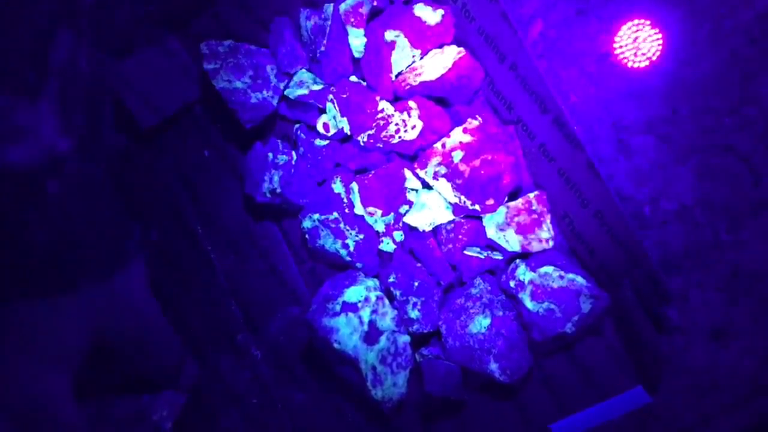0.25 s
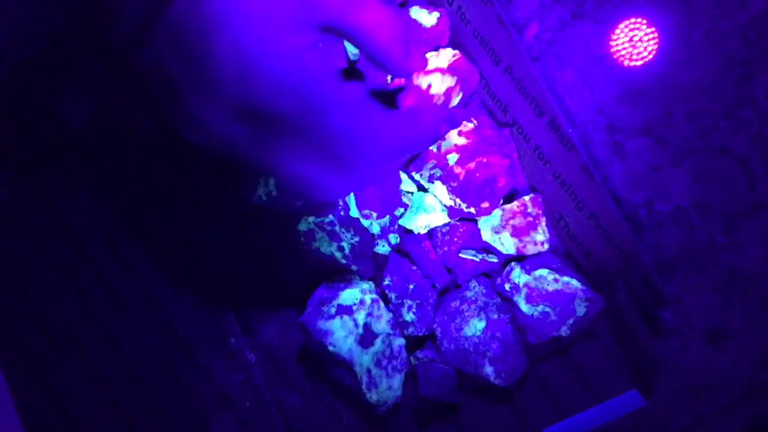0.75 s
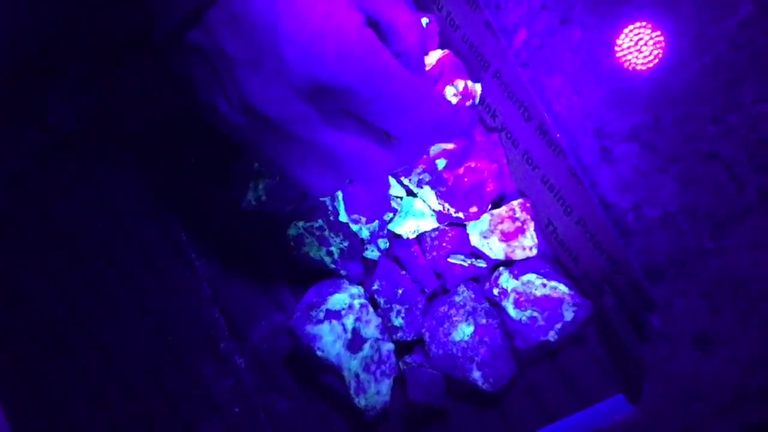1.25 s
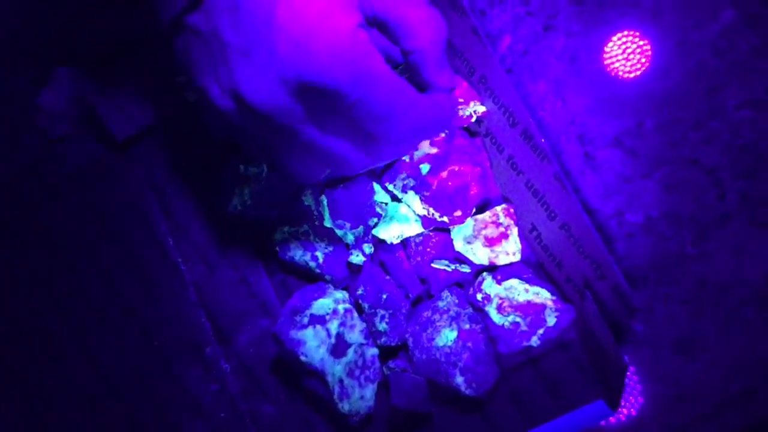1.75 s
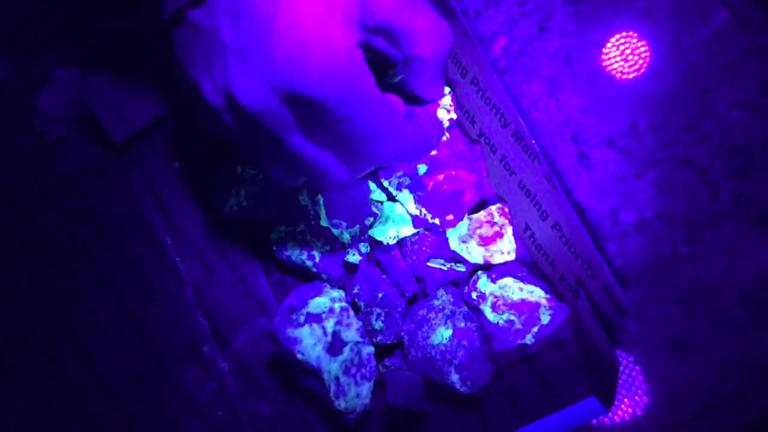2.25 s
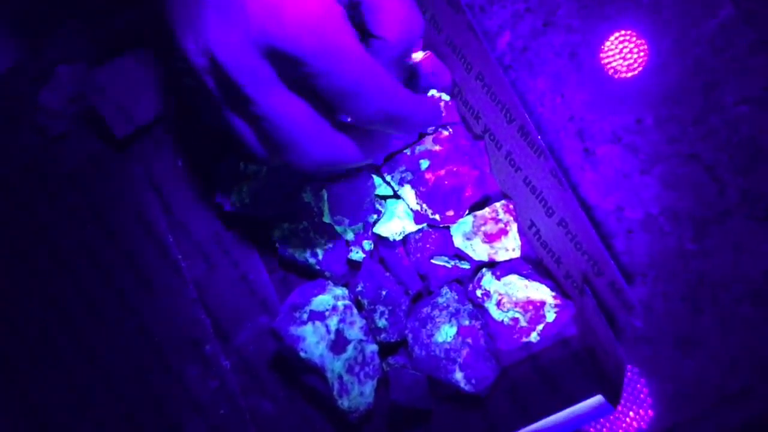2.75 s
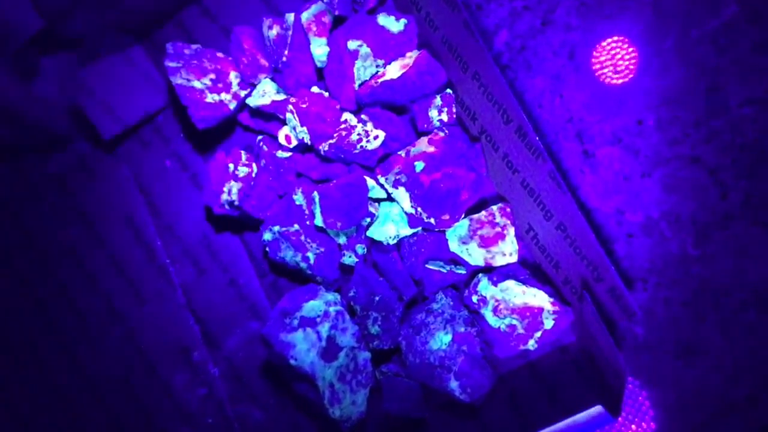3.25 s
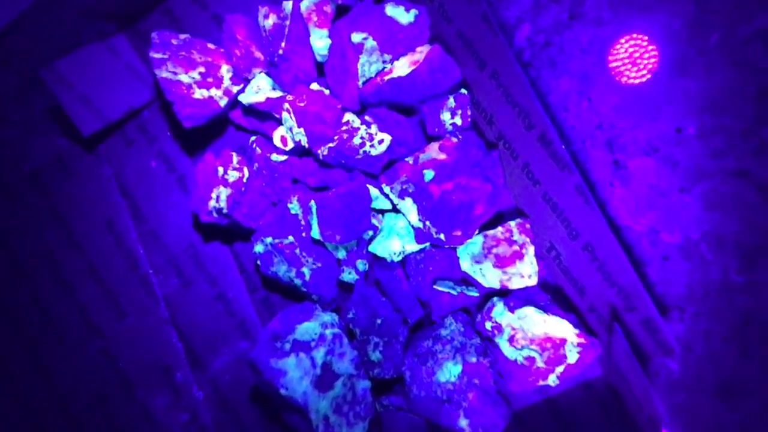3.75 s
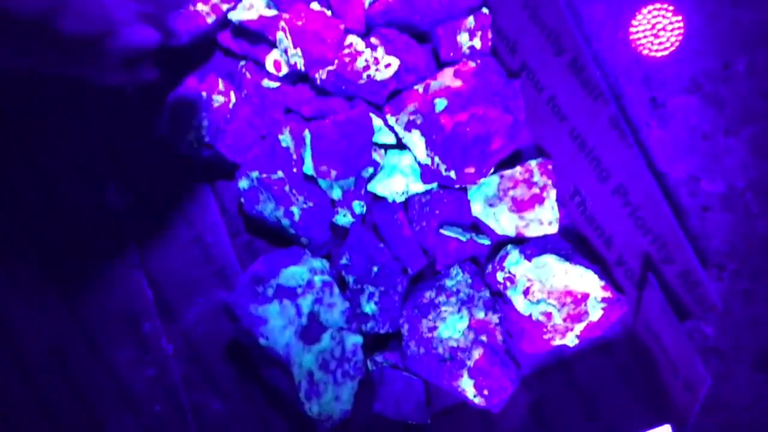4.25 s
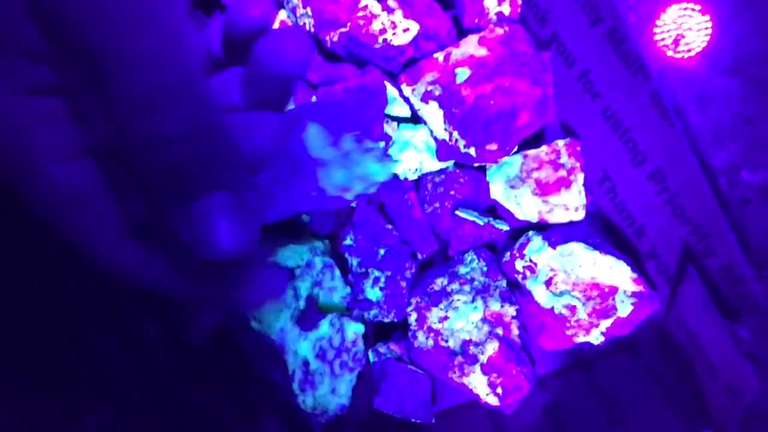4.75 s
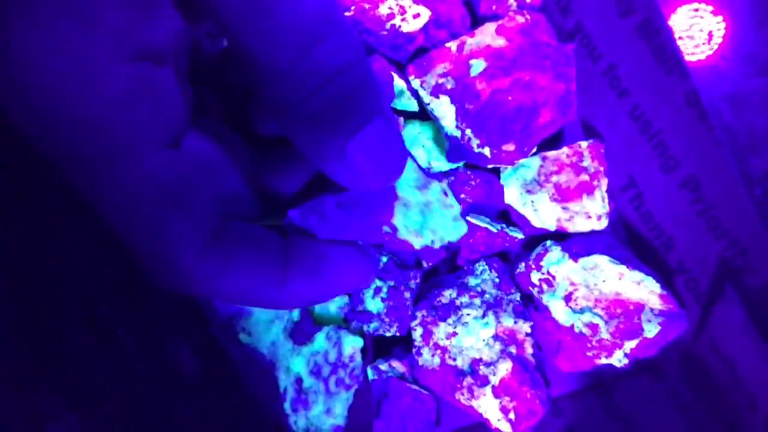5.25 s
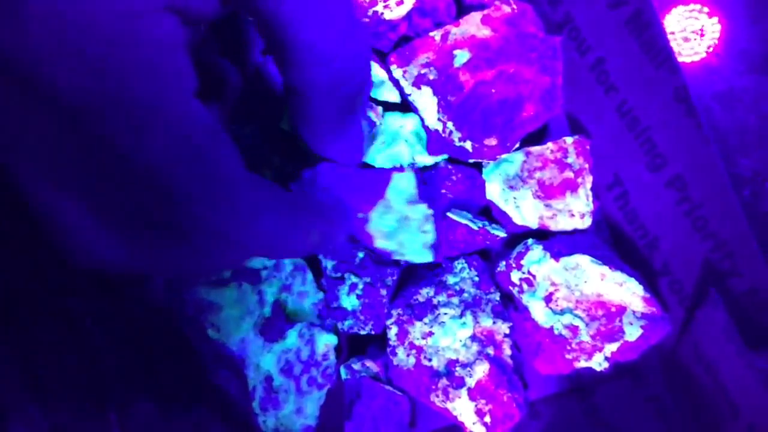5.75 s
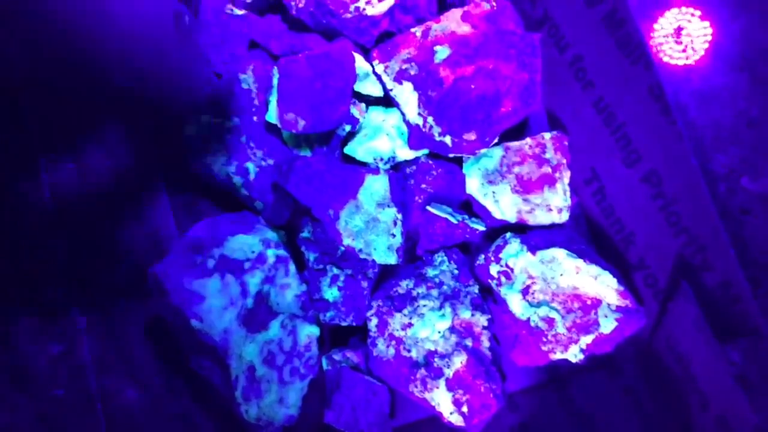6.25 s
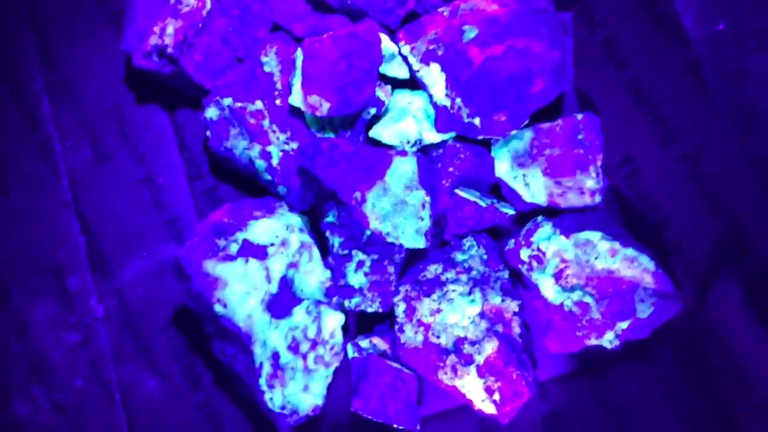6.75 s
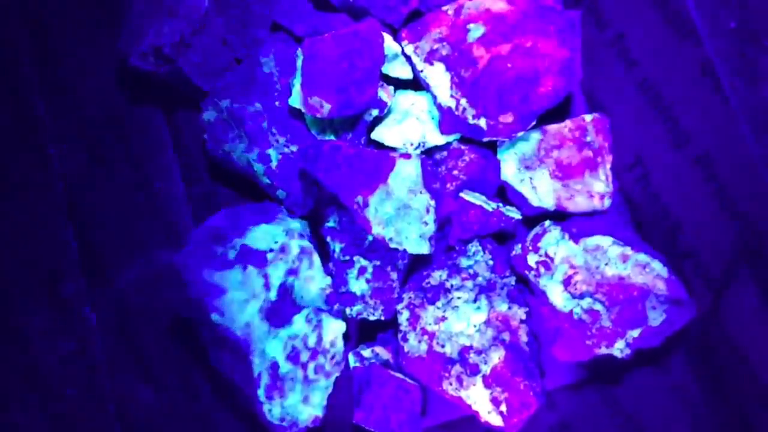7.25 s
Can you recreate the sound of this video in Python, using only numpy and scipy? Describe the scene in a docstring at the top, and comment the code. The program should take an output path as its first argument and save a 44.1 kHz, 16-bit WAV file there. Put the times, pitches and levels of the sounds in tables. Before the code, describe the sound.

Rough rock pieces are moved by hand in a wooden box, heard very close in a quiet room with faint air and low hum. At 0.14-0.18 s stones clack sharply, then a dry, hissing slide sinks in pitch and ends in a dull tap near 0.37 s. Quiet until 1.13 s, when light clinks and scrapes begin. The loudest hard knock lands at 1.49 s with a rattling tail; irregular clinks, gritty grinding and low wooden rumbles continue, with strong clacks near 1.97 and 2.57 s, thinning out by 3.05 s. At about 3.35 s a faint squeak and short clatter come from farther off. A lull follows, with soft low movement and a tiny bump and tick around 4.2 s. From 5.6 to 6.0 s brighter, harder clicks and short scrapes return, a crisp one at 5.96 s, then faint ticks until 6.4 s, and only quiet room tone to 7.5 s.

```python
"""Rough rock specimens in a wooden box, shifted by a hand close to the microphone: they clink, chip and grind.
Each clink is a short stony ring of damped modes, a noisy crack and a knock of the box.
Each push of the hand grinds in tiny slips, jostles neighbouring rocks and rumbles in the box.
A dry slide of hiss and sinking resonances opens the scene and ends in a dull tap.
Farther off something squeaks and clatters; a quiet room with a low hum answers."""
import sys
import numpy as np
from scipy import signal
from scipy.fft import rfft, irfft, next_fast_len
from scipy.io import wavfile
from scipy.ndimage import map_coordinates

SR = 44100
rng = np.random.default_rng(int(sys.argv[2]) if len(sys.argv) > 2 else 0)


def pcm_store(signal):
    """Save signal as 16-bit PCM."""
    levels = np.round(np.clip(np.atleast_2d(signal), -1, 1) * 32767)
    wavfile.write(sys.argv[1], SR, levels.astype(np.int16).T)


N = 331014


def amp(db):
    """Decibels to gain."""
    return 10 ** (np.asarray(db) / 20)


def unit(x):
    """Scale to rms 1."""
    return x / np.sqrt(np.mean(x ** 2) + 1e-20)


def along(points, hz):
    """Read (Hz, value) points on a log frequency axis."""
    f, v = np.transpose(points)
    return np.interp(np.log(hz + 1), np.log(f), v)


def coloured(x, spectrum):
    """Filter x causally to the given (Hz, dB) shape, by a minimum-phase response."""
    m = 2 * next_fast_len(len(x) // 2 + 2048, True)
    cepstrum = irfft(np.log(amp(along(spectrum, np.fft.rfftfreq(m, 1 / SR)))))
    # folding the cepstrum forward in time makes the response causal
    cepstrum[1:m // 2] *= 2
    cepstrum[m // 2 + 1:] = 0
    response = np.exp(rfft(cepstrum))
    return irfft(rfft(x, m) * response, m)[:len(x)]


def noise(spectrum, size=N):
    """Steady noise of the given (Hz, dB) shape at rms 1."""
    return unit(coloured(rng.standard_normal(size), spectrum))


def wobble(rate, size=N):
    """A smooth random curve with rate knots a second."""
    knots = rng.standard_normal(int(size * rate / SR) + 4)
    return map_coordinates(knots, [np.arange(size) * rate / SR])


def narrow(hz, width_hz, size=N):
    """Noise in one resonance, whose centre may move, at rms 1."""
    phase = 2 * np.pi * np.cumsum(hz * np.ones(size)) / SR
    in_phase = wobble(width_hz, size) * np.cos(phase)
    quadrature = wobble(width_hz, size) * np.sin(phase)
    return unit(in_phase + quadrature)


def add(track, s, sound):
    """Mix a sound into the track at time s."""
    part = track[round(s * SR):][:len(sound)]
    part += sound[:len(part)]


def struck(x, db):
    """Set the rms level of a sound's first 7 ms."""
    head = x[:round(.007 * SR)]
    return amp(db) * x / np.sqrt(np.mean(head ** 2) + 1e-20)


def ringing(modes, t, attack, scatter_db, detune):
    """Sum of damped modes, their strengths and pitches new for each blow."""
    hz, db, t60 = np.transpose(modes)[:, :, None]
    size, shift, side = rng.standard_normal((3, len(hz), 1))
    waves = np.sign(side) * np.sin(2 * np.pi * hz * (1 + detune * shift) * t)
    decay = amp(db + scatter_db * size - 60 * t / t60)
    return np.sum(decay * waves, 0) * (1 - np.exp(-t / attack))


def burst(t, contact, spectrum):
    """Rough faces meeting: a rush of tiny fractures that swells over the contact time and dies."""
    u = t / max(contact, .0001)
    return coloured(rng.standard_normal(len(t)) * u * np.exp(-u), spectrum)


def grains(level, rate, hz, pitch_spread, cycles, spread_db):
    """Tiny slips wherever the level is audible, each ringing for a few cycles at its own pitch."""
    count = int(rate * N / SR)
    when, size, tuning = rng.random((count, 3)).T
    at = (when * (N - 1)).astype(int)
    octave_spread = np.log((tuning + 1e-6) / (1 - tuning + 1e-6))  # logistic scatter about the centre
    pitch = np.clip(hz * np.exp(pitch_spread * octave_spread), 300, 17500)
    gain = amp(spread_db * np.minimum(-np.log(1 - size), 3.5))
    live = level[at] > amp(-88)
    n = np.arange(SR // 200)
    turns = pitch[live, None] * n / SR
    waves = np.sin(2 * np.pi * turns) * amp(-60 * turns / cycles) * (1 - np.exp(-turns))
    places = (at[live, None] + n).ravel()
    out = np.bincount(places, (gain[live, None] * waves).ravel(), N + len(n))[:N]
    return level * unit(out) * np.sqrt(np.mean(live))  # the last factor allows for the silent stretches


def stroke(start, length, attack_s, sag_db_per_s, release_db_per_s):
    """Gain of one movement: it rises, sags while it lasts, then dies away."""
    t = np.clip(np.arange(N) / SR - start, 0, None)
    fall_db = sag_db_per_s * np.minimum(t, length) + release_db_per_s * np.maximum(t - length, 0)
    return np.minimum(t / attack_s, 1) * amp(-np.minimum(fall_db, 200))


# spectrum of the room air: f/Hz, level/dB per Hz
AIR_COLOUR = [(20, -24.5), (42, -18.5), (59, -7), (77, -1), (102, -8.5), (134, -11.5), (200, -15.5),
              (414, -20.5), (739, -24.5), (1030, -25), (1390, -27), (2750, -32), (3800, -30.5),
              (16800, -39), (18000, -52.5)]
# low hum of the room: f/Hz, width/Hz, level/dB
HUM = [(76.7, 9.2, -69), (144, 14, -77.5), (408, 38, -85)]
# soft swells of low noise in the room: t/s, length/s, level/dB before sag and flicker
SWELLS = [(-.2, 0.22, -65.5), (4.106, 0.6, -70.5), (6.487, 0.705, -68)]
# spectrum of the swells: f/Hz, level/dB per Hz
SWELL_COLOUR = [(60, -6.5), (150, 0.5), (400, -6.5), (720, -11), (1080, -6), (1500, -15), (4000, -20),
                (12000, -31)]
SWELL_ATTACK_S, SWELL_SAG_DB_PER_S, SWELL_RELEASE_DB_PER_S = 0.15, 1, 34


def background():
    """Room air as coloured noise, a low hum as narrow resonances and a few soft swells."""
    air = amp(-67 + 0.26 * wobble(9.2)) * noise(AIR_COLOUR)
    swell = np.zeros(N)
    for s, length, db in SWELLS:
        swell += amp(db) * stroke(s, length, SWELL_ATTACK_S, SWELL_SAG_DB_PER_S, SWELL_RELEASE_DB_PER_S)
    rush = swell * amp(1.36 * wobble(14)) * noise(SWELL_COLOUR)
    hum = sum(amp(db) * narrow(hz, width) for hz, width, db in HUM)
    return air + rush + hum


# faint whistles in the background: t/s, f/Hz at the start, level/dB before the fade in and out
WHISTLES = [(.07, 4750, -76), (4.62, 4760, -79)]
WHISTLE_SAG_HZ_PER_S = 3600


def whistles():
    """Thin, faint whistles that sink a little: very narrow noise with a falling centre."""
    out, t = np.zeros(N), np.arange(SR // 12) / SR
    for s, hz, db in WHISTLES:
        tone = narrow(hz - WHISTLE_SAG_HZ_PER_S * t, 40, size=len(t))
        add(out, s, amp(db) * np.hanning(len(t)) * tone)
    return out


# decay of the room before scaling: f/Hz, t60/s
ROOM = [(100, 0.42), (300, 0.27), (800, 0.46), (1900, 0.2), (5000, 0.15), (14000, 0.18)]


def room(x, colour, decay_scale):
    """A diffuse answer by convolution with decaying noise, new every quarter second as things move."""
    out, step = np.zeros(N), SR // 4
    for start in range(0, N, step):
        hz, t, z = signal.stft(rng.standard_normal(SR // 2), SR, nperseg=256)
        t60 = decay_scale * along(ROOM, hz)[:, None]
        tail = signal.istft(z * amp(-60 * t / t60) / np.sqrt(t60), SR, nperseg=256)[1]
        answer = signal.fftconvolve(x[start:start + step], tail / np.linalg.norm(tail))
        add(out, start / SR + 0.002998, answer)
    return coloured(out, colour)


# treble wash from the walls: f/Hz, level/dB
WALLS = [(100, -60), (1400, -41.5), (2800, -12), (5000, -10.5), (10000, -17)]
WALL_BLUR = .09  # many paths even out a blow's spectrum over this share of each frequency


def walls(x):
    """The room stores the sound's energy band by band and gives it back as a smooth, dying wash."""
    hz, _, z = signal.stft(x, SR, nperseg=256)
    log_ratio = np.log((hz[:, None] + hz[1]) / (hz + hz[1]))
    blur = np.exp(-.5 * (log_ratio / WALL_BLUR) ** 2)
    power = blur / blur.sum(1, keepdims=True) @ np.abs(z) ** 2
    keep = amp(-60 * 128 / SR / along(ROOM, hz)) ** 2  # energy left after one 128-sample hop
    stored = np.array([signal.lfilter([0, 0, 1 - k], [1, -k], band) for k, band in zip(keep, power)])
    wash = signal.stft(rng.standard_normal(N), SR, nperseg=256)[2]
    returned = signal.istft(np.sqrt(stored) * wash / wash.std(), SR, nperseg=256)[1][:N]
    return coloured(returned, WALLS)


# a faint squeak leading into the far clatter: f/Hz, width/Hz, level/dB before distance
SQUEAK = [(1140, 230, -69), (2070, 400, -75), (3160, 530, -72)]


def squeak():
    """Something far off sticks for a moment before it clatters: a brief chord of narrow noises."""
    touch = stroke(3.332, 0.012, attack_s=0.003, sag_db_per_s=0, release_db_per_s=600)
    return touch * sum(amp(db) * narrow(hz, width) for hz, width, db in SQUEAK)


# knocks farther off, each rattling on: t/s, level/dB before distance, contact/s of the first impact
FAR = [(3.353, -50, 0.0015), (3.366, -43.5, 0.0017), (3.376, -46.5, 0.0016), (3.385, -45.5, 0.0019),
       (3.409, -47.5, 0.0021), (3.45, -61, 0.0058), (3.492, -58, 0.0039), (3.58, -57.5, 0.0043)]
# spectrum of the far knocks: f/Hz, level/dB per Hz
FAR_COLOUR = [(88, -17), (150, -6), (200, -9.5), (303, 3), (380, -11), (620, -3), (820, -4), (1120, -5.5),
              (1500, -10.5), (2100, -4.5), (2700, -15.5), (3150, -9.5), (4200, -15.5), (6020, -21),
              (8500, -25), (11000, -40), (16000, -47)]
# each rebound is weaker and, at this ratio, its contact shorter
RATTLE_GAP_S, RATTLE_LOSS_DB, RATTLE_CONTACT_RATIO = .0115, 4.5, 0.92


def far_clatter(count=5):
    """Knocks across the room, each a run of fading noise bursts; the longer the contact, the duller."""
    out, t = np.zeros(N), np.arange(SR // 8) / SR
    for s, db, first_contact in FAR:
        for k in range(count):
            contact = first_contact * RATTLE_CONTACT_RATIO ** k
            softness = [(1800, 0.0019), (7000, 3 - 2200 * contact)]
            knock = coloured(burst(t, contact, FAR_COLOUR), softness)
            add(out, s, struck(knock, db - RATTLE_LOSS_DB * k))
            s += RATTLE_GAP_S * np.exp(.15 * rng.standard_normal())
    return out


# a heavy rock settles on the box: t/s, level/dB before rise and decay
SETTLES = [(.137, -46), (.16, -52), (5.665, -57), (5.813, -59), (5.965, -46)]
# spectrum of its boom: f/Hz, level/dB per Hz
SETTLE_COLOUR = [(40, -22), (90, -10), (135, 2), (190, -1), (260, -8), (420, -14), (600, -10), (800, -18),
                 (1500, -30), (4000, -60)]
SETTLE_ATTACK_S, SETTLE_T60_S = 0.004, .15


def settling():
    """A heavy rock's weight lands on the box, which booms briefly as decaying low noise."""
    out, t = np.zeros(N), np.arange(SR // 4) / SR
    for s, db in SETTLES:
        boom = noise(SETTLE_COLOUR, size=len(t))
        add(out, s, boom * amp(db - 60 * t / SETTLE_T60_S) * (1 - np.exp(-t / SETTLE_ATTACK_S)))
    return out


# a soft bump on the box as the hand comes back: t/s, level/dB
BUMPS = [(4.2241, -55.5)]
# its dull, quickly damped modes: f/Hz, level/dB, t60/s
BUMP_MODES = [(191, -9, 0.026), (400, 1.5, 0.012), (550, -10.5, 0.012)]


def bumps():
    """A soft touch rings a few dull modes of the box without any crack."""
    out, t = np.zeros(N), np.arange(SR // 20) / SR
    for s, db in BUMPS:
        add(out, s, struck(ringing(BUMP_MODES, t, attack=0.0026, scatter_db=1, detune=0.009), db))
    return out


# a dull tap, first grazing and then landing: t/s, length/s, level/dB
TAPS = [(0.362, 0.0056, -55), (0.372, .009, -45.5)]
# its spectrum: f/Hz, level/dB per Hz
TAP_COLOUR = [(150, -22), (400, -6), (700, -16), (1050, -9), (1300, 1), (1520, 1), (1800, -8.5),
              (2500, -11), (3800, -19), (4700, -16), (5600, -21), (6600, -17), (9000, -23), (17000, -34)]
TAP_ATTACK_S, TAP_RELEASE_DB_PER_S = 0.0031, 1100


def tap():
    """A dull, brushing tap of shaped noise ends the opening slide."""
    touch = np.zeros(N)
    for s, length, db in TAPS:
        touch += amp(db) * stroke(s, length, TAP_ATTACK_S, 0, TAP_RELEASE_DB_PER_S)
    return touch * noise(TAP_COLOUR)


# dry slides: t/s, length/s, hiss level/dB and resonance level/dB before sag, first f/Hz, last f/Hz
SLIDES = [(0.147, 0.038, -46.5, -59, 2200, 2000), (0.193, 0.062, -41.5, -47.5, 3450, 2900),
          (0.264, 0.048, -47.5, -54, 2950, 2500), (0.312, 0.005, -60, -47, 2450, 2330)]
# resonances of the sliding rock: multiple of the lowest, level/dB at full speed
SLIDE_MODES = [(1, 0), (1.29, -2.5), (1.72, -1)]
# spectrum of the hiss: f/Hz, level/dB per Hz
HISS = [(180, -20), (300, -9), (401, -17), (595, -12.5), (1500, -15), (2600, -7), (3030, -10.5),
        (10400, -16), (14900, -17.5), (17100, -21), (18000, -37.5)]
SLIDE_WIDTH_HZ = 700  # of the lowest resonance; the higher ones are wider in proportion
SLIDE_ATTACK_S, SLIDE_RELEASE_DB_PER_S = 0.012, 708
HISS_SAG_DB_PER_S, RESONANCE_SAG_DB_PER_S = 97, 38  # both weaken as a slide slows
RASP_DB, RASPS_PER_S = 3, 320  # a slide catches and frees unevenly


def slide():
    """Quick slides over fine grit; friction brakes each one, and its resonances sink with the speed."""
    gain, resonance = np.zeros(N), np.zeros(N)
    t = np.arange(SR // 2) / SR  # all slides fall in the first half second
    for s, length, hiss_db, tone_db, first_hz, last_hz in SLIDES:
        speed = np.sqrt(1 - np.clip((t - s) / length, 0, 1))
        hz = last_hz + (first_hz - last_hz) * speed
        tone = np.zeros(len(t))
        for ratio, db in SLIDE_MODES:
            mode = narrow(hz * ratio, SLIDE_WIDTH_HZ * ratio, size=len(t))
            tone += amp(db) * speed ** (ratio - 1) * mode
        tone_gain = stroke(s, length, SLIDE_ATTACK_S, RESONANCE_SAG_DB_PER_S, SLIDE_RELEASE_DB_PER_S)
        add(resonance, 0, amp(tone_db) * tone * tone_gain[:len(t)])
        gain += amp(hiss_db) * stroke(s, length, SLIDE_ATTACK_S, HISS_SAG_DB_PER_S, SLIDE_RELEASE_DB_PER_S)
    hiss = gain * amp(RASP_DB * wobble(RASPS_PER_S) - 3.0) * noise(HISS)
    sand = grains(gain * amp(-3.5), rate=1800, hz=5470, pitch_spread=0.244, cycles=16, spread_db=4.5)
    return hiss + sand + resonance


# the hand pushes rocks over each other:
# t/s, length/s, then rub level/dB, grit level/dB and rumble level/dB before sag and trims
PUSHES = [(1.132, 0.16, -61.5, -75.5, -60.5), (1.391, 0.092, -61, -69.5, -59.5),
          (1.497, 0.08, -48, -67.5, -52), (1.714, .15, -58, -78, -79), (1.858, .1, -56.5, -65, -65),
          (1.98, 0.22, -51.5, -62.5, -55), (2.223, 0.16, -56.5, -63.5, -59.5),
          (2.432, 0.06, -52, -66.5, -56.5), (2.558, .2, -55, -62.5, -58), (2.737, 0.11, -81.5, -92, -61.5),
          (2.899, 0.038, -56, -75.5, -59), (2.998, 0.38, -81.5, -94.5, -67.5), (5.666, 0.05, -54, -64, -58),
          (5.797, 0.047, -57, -65, -55), (5.948, 0.041, -51.5, -70.5, -50),
          (6.115, 0.053, -65.5, -77.5, -83)]
# a push takes hold, eases and lets go
PUSH_ATTACK_S, PUSH_SAG_DB_PER_S, PUSH_RELEASE_DB_PER_S = 0.0085, 24.5, 259
RUMBLE_RELEASE_DB_PER_S = 110  # the box settles more slowly


def pushing():
    """Gains of rub, grit and rumble over all the pushes."""
    rub, grit, rumble = np.zeros((3, N))
    for s, length, rub_db, grit_db, rumble_db in PUSHES:
        effort = stroke(s, length, PUSH_ATTACK_S, PUSH_SAG_DB_PER_S, PUSH_RELEASE_DB_PER_S)
        weight = stroke(s, length, PUSH_ATTACK_S, PUSH_SAG_DB_PER_S, RUMBLE_RELEASE_DB_PER_S)
        rub += amp(rub_db) * effort
        grit += amp(grit_db) * effort
        rumble += amp(rumble_db) * weight
    return rub, grit, rumble


# spectrum of rock rubbing on rock: f/Hz, level/dB per Hz
RUB = [(500, -18.5), (850, -10), (1100, 1.5), (1450, -4.5), (1800, 5), (2150, -7.5), (2600, -21.5),
       (4000, -12.5), (6000, -30.5), (12000, -44)]
# spectrum of the box's rumble: f/Hz, level/dB per Hz
RUMBLE = [(50, -25), (100, -8.5), (135, 3.5), (170, -4.5), (200, -7), (250, -9), (400, -20.5), (700, -14.5),
          (1500, -54)]
FINE_PER_S, MIDDLING_PER_S, SLIP_SPREAD_DB = 5000, 2200, 4.2  # tiny slips crowd together under a push


def grinding():
    """Rough faces catch and slip: coarse slips ring the rocks, fine ones crush grit, the box rumbles."""
    rub_gain, grit_gain, rumble_gain = pushing()
    catch = amp(3.5 * wobble(75))
    coarse = grains(rub_gain * catch * amp(-7.5), rate=490, hz=1870,
                    pitch_spread=.2, cycles=12, spread_db=3.0)
    middling = grains(grit_gain * catch * amp(2.0), rate=MIDDLING_PER_S, hz=3098,
                      pitch_spread=0.32, cycles=12, spread_db=SLIP_SPREAD_DB)
    fine = grains(grit_gain * catch * amp(-2.5), rate=FINE_PER_S, hz=9400,
                  pitch_spread=0.27, cycles=9.1, spread_db=SLIP_SPREAD_DB)
    rub = rub_gain * catch * amp(-4.0) * noise(RUB)
    rumble = rumble_gain * noise(RUMBLE)
    return coarse + middling + fine + rub + rumble


JOSTLES_PER_S, JOSTLE_CONTACT_S = 45, 0.0009  # small random clinks within a push
JOSTLE_HZ, JOSTLE_EDGE_HZ, JOSTLE_BOARD_HZ = 1707, 4200, 1139  # centres of the random pitches
JOSTLE_PITCH_SPREAD, JOSTLE_SCATTER_DB = .17, 1
JOSTLE_RING_DB, JOSTLE_KNOCK_DB = -3.5, -3  # relative to the push's rub
JOSTLE_CRACK_DB, JOSTLE_GRIT_DB = -2, -5  # relative to the push's grit


def jostling():
    """Neighbouring rocks of all sizes touch at random during a push, the louder the harder it is."""
    out = np.zeros(N)
    centres = np.array([JOSTLE_HZ, JOSTLE_EDGE_HZ, JOSTLE_BOARD_HZ])
    for s, length, rub_db, grit_db, _ in PUSHES:
        count = int(length * JOSTLES_PER_S)
        for k in range(count):
            when = s + length * (k + rng.random()) / count
            body_db, edge_db = np.array([rub_db, grit_db]) + JOSTLE_SCATTER_DB * rng.standard_normal(2)
            hz, edge_hz, board_hz = centres * np.exp(JOSTLE_PITCH_SPREAD * rng.standard_normal(3))
            touch = clink(hz, body_db + JOSTLE_RING_DB, JOSTLE_CONTACT_S, edge_db + JOSTLE_CRACK_DB,
                          edge_db + JOSTLE_GRIT_DB, body_db + JOSTLE_KNOCK_DB, edge_hz, board_hz)
            add(out, when, touch)
    return out


# a sharp edge chips without ringing the rock: t/s, grit level/dB, contact/s
CHIPS = [(0.157, -48, .0007), (.2805, -52.5, 0.00087), (.294, -55.5, .001), (1.2497, -60.5, 0.00055),
         (1.292, -69, 0.00057), (1.321, -69.5, 0.00065), (1.403, -70, .0005), (1.806, -61, 0.0011),
         (2.133, -53.5, 0.0015), (2.1401, -46, 0.0014), (2.165, -55.5, 0.0019), (2.363, -61, 0.0013),
         (2.615, -49.5, 0.00059), (2.654, -52.5, 0.0011), (2.665, -55, 0.0008), (2.692, -54.5, 0.0013),
         (4.4644, -67.5, 0.00074), (5.6013, -62, 0.00053), (5.735, -58.5, 0.00068), (5.9008, -63, .0008),
         (5.95, -60, 0.00063), (6.3816, -62, 0.00068), (6.4175, -66.5, 0.00054)]
# spectrum of a contact's crack: f/Hz, level/dB per Hz
CRACK = [(600, -40), (1800, -4.5), (3000, -3.5), (4500, -6), (5800, -8), (8000, -15), (16000, -39.5)]
# spectrum of crushed grit: f/Hz, level/dB per Hz
GRIT = [(1500, -30), (4500, -7), (6800, 2), (9000, 1.5), (10500, -5.5), (14000, -1), (18000, -17.5)]
CHIP_CRACK_DB = -6.5  # a chip's crack relative to its grit


def chips():
    """An edge gives way: a bright tick of grit with a faint crack."""
    out, t = np.zeros(N), np.arange(SR // 30) / SR
    for s, db, contact in CHIPS:
        grit = struck(burst(t, contact, GRIT), db)
        crack = struck(burst(t, contact, CRACK), db + CHIP_CRACK_DB)
        add(out, s, grit + crack)
    return out


# modes of a rock lump: multiple of its pitch, level/dB
ROCK = [(.6, -16.5), (.72, -16.5), (.91, -4), (0.999, 8), (1.121, -6), (1.27, -5.5), (1.66, -13.5),
        (2.14, -20)]
# the rest of the pile rings in sympathy, its modes merged into a band: f/Hz, level/dB per Hz
PILE = [(500, -26.5), (900, -10.5), (1150, -3.5), (1500, -4), (1800, 1), (2300, -3), (2650, -14),
        (3200, -15), (4400, -15), (5500, -26.5), (12000, -50.5)]
# high, quickly damped modes that a hard blow wakes in the rocks: f/Hz, level/dB, t60/s
HARD = [(2382, -3, 0.014), (3160, 0, 0.0097), (3770, 2, 0.012), (4370, 0, .007), (5410, -1.5, 0.012),
        (6430, -8.5, 0.012), (6700, -12.5, 0.008)]
# modes of the box boards: f/Hz, level/dB, t60/s
BOARDS = [(594, -10, 0.055), (690, -9.5, 0.017), (954, -10.5, 0.022), (1067, -5, 0.045),
          (1140, 1.5, 0.0066), (1256, 11, 0.0028), (1300, -6, 0.034)]
# low modes of the box and its support: f/Hz, level/dB, t60/s
BASE = [(81.5, -3.5, 0.24), (131.8, -3.5, 0.34), (167, -1.5, 0.099), (232, -3.5, 0.087), (305, -3, 0.07),
        (390, -2, 0.061)]
# the box's dense, unpitched answer: f/Hz, level/dB per Hz
KNOCK_NOISE = [(60, -13), (150, 0.5), (300, -5), (600, -7.5), (1200, 2), (2500, -16.5), (8000, -44)]
LUMP_T60_S, LUMP_T60_PER_CONTACT = 0.0076, 8.1  # a longer contact keeps the lump ringing longer
LINGER_DB, LINGER_T60_S = -23, .11  # a faint ring at each lump's own pitch, relative to the main ring
PILE_DB, PILE_T60_S, PILE_ATTACK_S = -18.5, 0.3, .004  # level relative to the ring
CHATTER_DB, CHATTERS_PER_S = 4, 220  # the loose rocks rattle as they ring
HARD_DB, CRACK_DB = -8.5, -3.5  # a crack's pitched and noisy parts, relative to its nominal level
EDGE_PEAK_DB, EDGE_WIDTH = 12.5, 0.082  # resonance of the struck edge; width is a share of its pitch
BOARD_DB, BOARD_T60_S = -7, .016  # the board right under the rocks, relative to the nominal knock
KNOCK_NOISE_S, KNOCK_NOISE_DB = 0.0046, -14  # swell time, and level relative to the nominal knock
# level of the thud in the support at a reference knock, and dB gained per dB of knock
THUD_DB, THUD_AT_KNOCK_DB, THUD_GROWS = -61, -49, 0.61


def clink(hz, ring_db, contact, crack_db, grit_db, box_db, edge_hz, board_hz):
    """One contact rings lump and pile, cracks, crushes grit and knocks the box; a long one swells slowly."""
    t, brief = np.arange(SR // 5) / SR, np.arange(SR // 25) / SR
    # the rocks ring
    lump = [(hz * ratio, db, LUMP_T60_S + LUMP_T60_PER_CONTACT * contact) for ratio, db in ROCK]
    ring = struck(ringing(lump, brief, attack=contact + .0005, scatter_db=5.0, detune=0.0099), ring_db)
    one_mode = [(hz, 0, LINGER_T60_S)]
    lingering = struck(ringing(one_mode, t, attack=PILE_ATTACK_S, scatter_db=0, detune=.015),
                       ring_db + LINGER_DB)
    chatter = amp(CHATTER_DB * wobble(CHATTERS_PER_S, size=len(t))) * rng.standard_normal(len(t))
    pile_gain = amp(ring_db + PILE_DB - 60 * t / PILE_T60_S) * (1 - np.exp(-t / PILE_ATTACK_S))
    pile = unit(coloured(chatter, PILE)) * pile_gain
    # their faces break
    clack = struck(ringing(HARD, brief, attack=contact, scatter_db=1.5, detune=0.06), crack_db + HARD_DB)
    edge = [(edge_hz / (1 + EDGE_WIDTH), 0), (edge_hz, EDGE_PEAK_DB), (edge_hz * (1 + EDGE_WIDTH), 0)]
    crack = struck(coloured(burst(brief, 1.1 * contact, CRACK), edge), crack_db + CRACK_DB)
    grit = struck(burst(brief, contact, GRIT), grit_db)
    # the box and its support answer
    under = [(board_hz, 0, BOARD_T60_S)]
    board = struck(ringing(under, brief, attack=contact, scatter_db=0, detune=.01), box_db + BOARD_DB)
    knock = struck(ringing(BOARDS, brief, attack=contact, scatter_db=3.0, detune=0.02), box_db - 10.0)
    puff = struck(burst(t, KNOCK_NOISE_S, KNOCK_NOISE), box_db + KNOCK_NOISE_DB)
    thud_db = THUD_DB + THUD_GROWS * (box_db - THUD_AT_KNOCK_DB)
    thud = struck(ringing(BASE, t, attack=0.0033, scatter_db=1.5, detune=0.026), thud_db)
    out = pile + lingering + puff + thud
    add(out, 0, ring + clack + crack + grit + board + knock)
    return out


# one rock strikes another: t/s, pitch f/Hz, ring level/dB, contact/s, nominal crack level/dB,
# grit level/dB, nominal box knock level/dB, struck edge f/Hz, board under it f/Hz
CLINKS = [(0.1361, 1143, -41, 0.0004, -45.5, -52, -34, 6190, 870),
          (0.142, 1865, -46, 0.00062, -45, -52, -36.5, 2400, 1160),
          (0.1747, 2520, -32.5, 0.00027, -35.5, -46.5, -40, 3560, 1420),
          (0.176, 1610, -36, 0.00032, -37, -56, -37, 5400, 673),
          (0.1833, 2080, -37.5, 0.0011, -35.5, -60, -57, 3050, 1310),
          (1.1299, 1930, -41.5, 0.00089, -54.5, -64.5, -44, 4440, 1400),
          (1.166, 1850, -55, 0.001, -64, -69, -54, 4000, 1300),
          (1.188, 1660, -53.5, 0.0011, -56, -65, -59, 4230, 1150),
          (1.208, 1760, -55.5, 0.00079, -68, -67, -63, 6750, 1110),
          (1.389, 1770, -58, 0.0011, -61.5, -85, -55, 3700, 1180),
          (1.4221, 1850, -53, 0.002, -72, -68.5, -51, 5540, 1060),
          (1.4882, 1926, -23.5, 0.0009, -31, -48.5, -27.5, 3830, 1181),
          (1.4979, 1770, -30.5, 0.00082, -36, -67, -35, 3130, 1220),
          (1.502, 1930, -36, 0.001, -41.5, -63.5, -41, 3850, 1360),
          (1.509, 1710, -40, 0.0012, -55, -67, -43, 2650, 1040),
          (1.5277, 1910, -41.5, 0.0015, -62.5, -78, -53, 2650, 1380),
          (1.551, 2080, -44, 0.0015, -60.5, -76, -46, 2650, 1120),
          (1.566, 1855, -42, 0.0011, -63, -65.5, -46, 2650, 1310),
          (1.5725, 1540, -43, 0.001, -62, -71.5, -47, 2640, 1420),
          (1.576, 1800, -39, 0.0008, -59, -67, -43, 2640, 1250),
          (1.6436, 1880, -50, 0.00097, -85, -77, -69, 2650, 950),
          (1.7341, 1796, -40.5, 0.0012, -76, -69, -58.5, 2650, 1030),
          (1.781, 1820, -52.5, 0.002, -72.5, -80, -64.5, 2660, 1100),
          (1.866, 1900, -52, 0.003, -72, -76, -69, 2650, 1100),
          (1.883, 1794, -42.5, 0.0023, -49, -60.5, -71, 3100, 970),
          (1.8896, 1730, -43.5, 0.0018, -47, -54.5, -66, 4100, 970),
          (1.907, 1500, -72, 0.0008, -61, -59.5, -53, 3110, 1080),
          (1.937, 1820, -58, 0.0015, -50.5, -62, -46, 3150, 1140),
          (1.9672, 1873, -29.5, 0.0016, -41, -64.5, -42, 3020, 1240),
          (1.971, 1790, -30, 0.0012, -59, -66.5, -38, 3100, 1020),
          (2.0446, 1706, -57, 0.00045, -51, -70, -51, 3110, 1050),
          (2.06, 1730, -45, 0.0011, -49.5, -71.5, -44, 2970, 1060),
          (2.1051, 1763, -39, 0.0018, -44.5, -61.5, -47.5, 4100, 1100),
          (2.249, 1850, -69, 0.00092, -50.5, -59, -68.5, 4600, 950),
          (2.408, 1820, -59, 0.0014, -59, -76, -47, 3070, 1100),
          (2.429, 1860, -50, 0.0018, -52, -60, -53, 3030, 1090),
          (2.442, 2090, -41, 0.0011, -47.5, -52, -40.5, 6660, 1000),
          (2.4666, 1880, -45, 0.00083, -48, -55.5, -42, 6580, 1250),
          (2.4716, 1730, -40, 0.0005, -40.5, -51, -38, 6640, 1120),
          (2.555, 1770, -52, 0.0025, -58, -74, -58, 2630, 1200),
          (2.569, 1842, -30, 0.0014, -43, -64, -72, 2630, 1380),
          (2.7322, 1880, -50, 0.0029, -49, -53, -47.5, 6270, 1310),
          (2.751, 1610, -61, 0.0011, -48, -55.5, -42.5, 3750, 1360),
          (2.8959, 1640, -53, 0.00078, -54, -55.5, -60, 5800, 1390),
          (2.911, 1635, -49, 0.0016, -51.5, -70, -50, 4280, 1380),
          (2.926, 1480, -47.5, 0.00091, -72, -78.5, -49, 2650, 1120),
          (2.946, 1740, -44.5, 0.0009, -53, -66, -50.5, 2590, 1130),
          (3.0504, 1633, -61, 0.0009, -81.5, -85.5, -57, 4560, 1090),
          (4.2582, 1658, -55.5, 0.0013, -53, -51.5, -85, 2590, 1370),
          (5.663, 4300, -40, 0.00025, -32.5, -48, -40, 4870, 590),
          (5.674, 3410, -36.5, 0.00073, -38, -64, -47, 3360, 1370),
          (5.687, 1600, -45, 0.0023, -41.5, -65, -46.5, 4280, 1100),
          (5.726, 1730, -48.5, 0.00065, -55.5, -71.5, -50, 3690, 590),
          (5.807, 1740, -49, 0.0011, -56, -61.5, -52, 4230, 1410),
          (5.8238, 1900, -60, 0.0004, -47, -56, -52, 4490, 644),
          (5.843, 1690, -58, 0.00089, -55, -64, -55, 4280, 606),
          (5.855, 1750, -58, 0.001, -66, -77, -64, 3200, 1100),
          (5.937, 1690, -55, 0.0023, -57, -69, -56, 3390, 1060),
          (5.9572, 3400, -45, 0.00053, -30.5, -35, -39, 6100, 1450),
          (6.125, 1850, -59.5, 0.00085, -63.5, -71, -65, 2630, 1250),
          (6.144, 1700, -59, 0.002, -72, -67, -67, 2630, 1250),
          (6.172, 1820, -63, 0.0015, -81, -78, -78, 2650, 1375),
          (6.2375, 2480, -60, 0.001, -52.5, -57.5, -53.5, 4230, 600),
          (6.2606, 1790, -56, 0.00094, -54, -63.5, -56, 4580, 930)]


def clinks():
    """The distinct blows of rock on rock, each a contact with its own pitch, hardness and levels."""
    out = np.zeros(N)
    for s, *blow in CLINKS:
        add(out, s, clink(*blow))
    return out


def scene():
    """Near rocks with quick echoes off box and table and the room's answer; a far clatter; quiet air."""
    floor = background() + whistles()
    far = far_clatter() + squeak()
    near = clinks() + chips() + slide() + grinding() + jostling() + bumps() + settling() + tap()
    # echo colours: f/Hz, level/dB
    echo_colour = [(200, -8), (1500, -6.0), (4000, -17.5), (10000, -16)]
    mids_colour = [(200, -5), (900, -5.5), (2000, -10), (3200, -23.5), (6000, -45.5)]
    far_colour = [(200, 5.5), (450, 3.0), (1000, 3.5), (2000, 0.5), (5000, 1.5), (10000, -29)]
    close_echo = room(near, echo_colour, decay_scale=0.17)
    mids = room(near, mids_colour, decay_scale=1.0)
    distant = amp(3.5) * far + room(far, far_colour, decay_scale=1.36)
    return (near + close_echo + mids + walls(near) + distant + floor)[None]


TOP_HZ = 18400


def record(dry):
    """The recorder keeps nothing above its band limit."""
    m = next_fast_len(N + 8192)
    passband = np.fft.rfftfreq(m, 1 / SR) < TOP_HZ
    return irfft(rfft(dry, m) * passband, m)[:, :N]


dry = scene()
out = record(dry)
pcm_store(out)
```